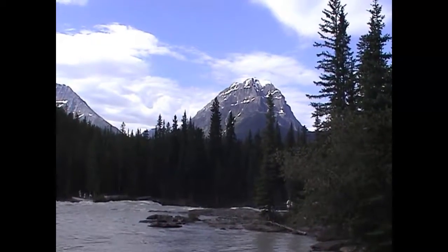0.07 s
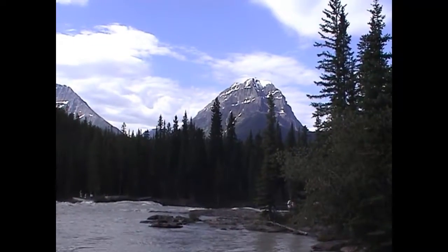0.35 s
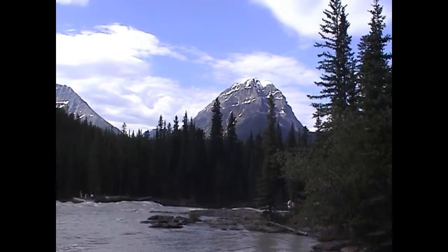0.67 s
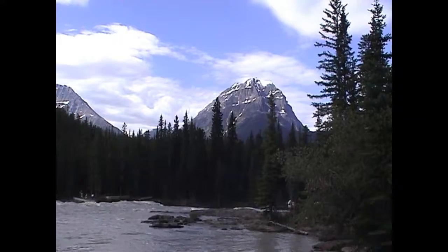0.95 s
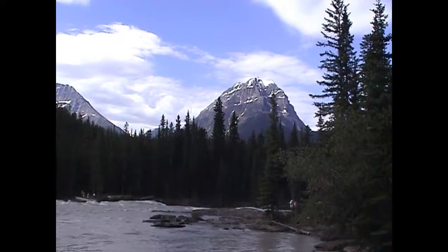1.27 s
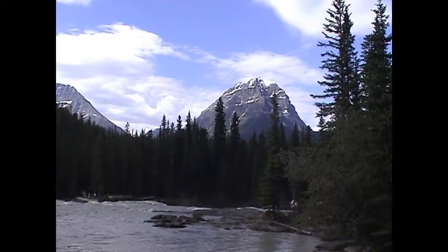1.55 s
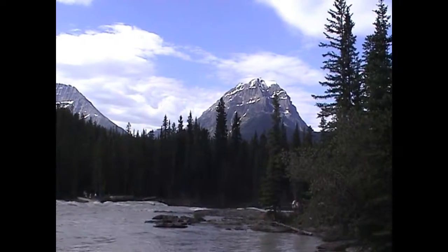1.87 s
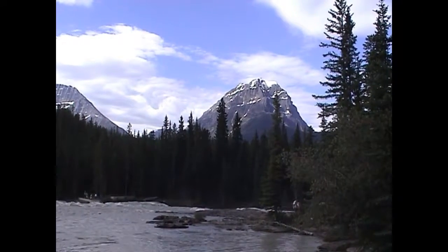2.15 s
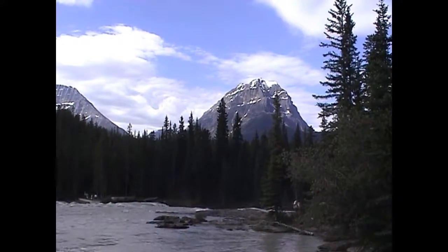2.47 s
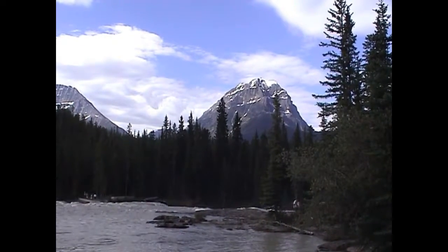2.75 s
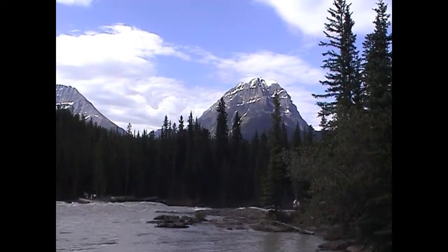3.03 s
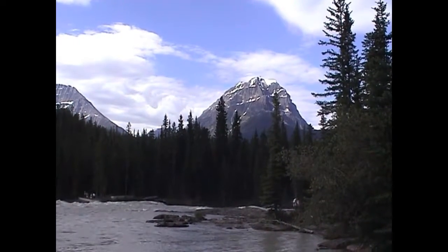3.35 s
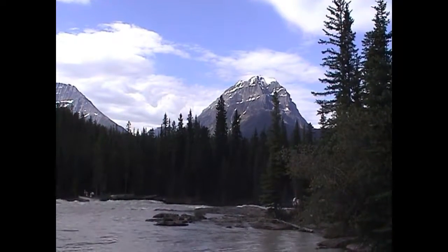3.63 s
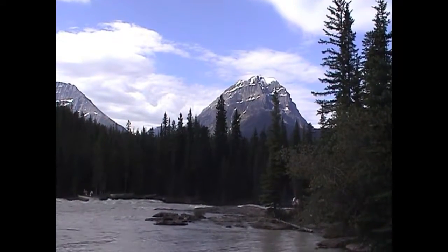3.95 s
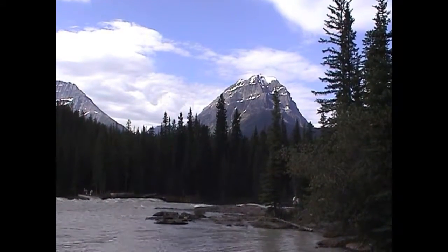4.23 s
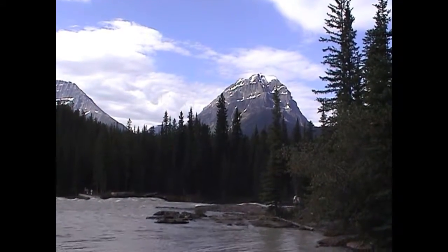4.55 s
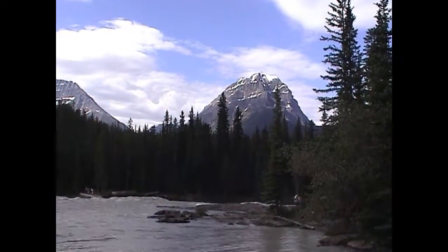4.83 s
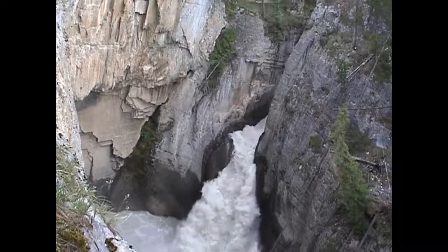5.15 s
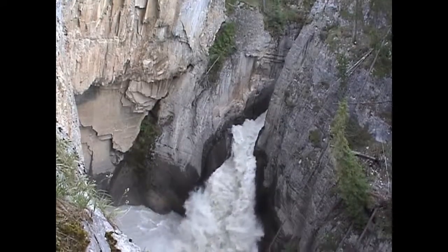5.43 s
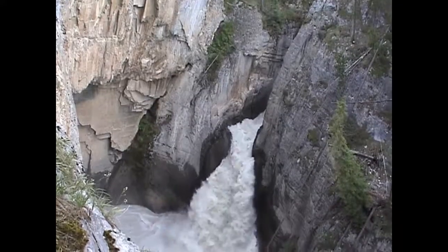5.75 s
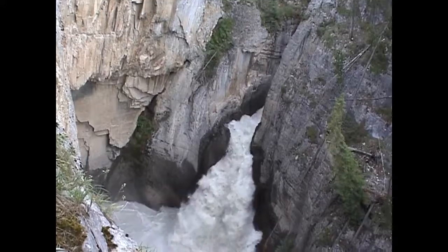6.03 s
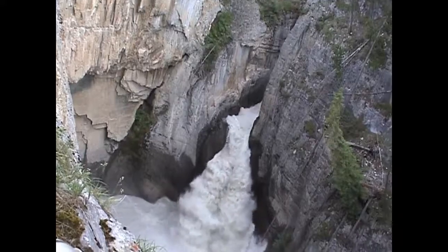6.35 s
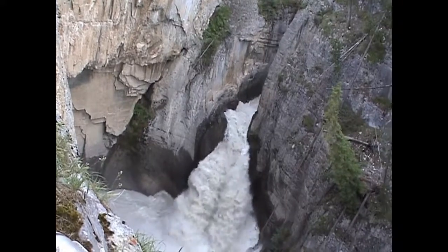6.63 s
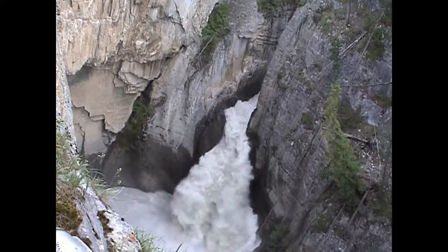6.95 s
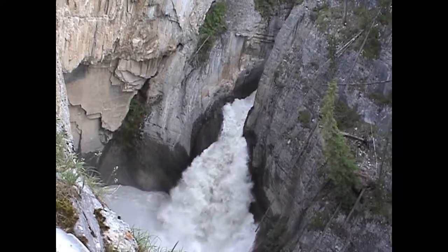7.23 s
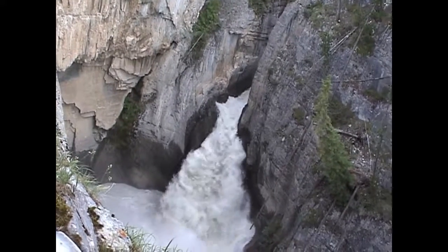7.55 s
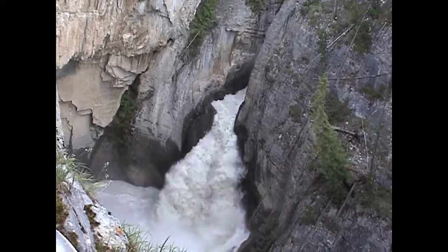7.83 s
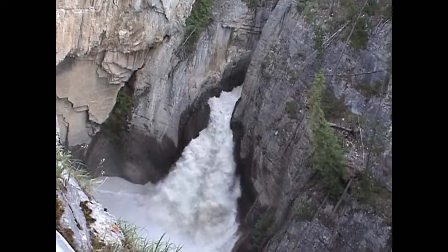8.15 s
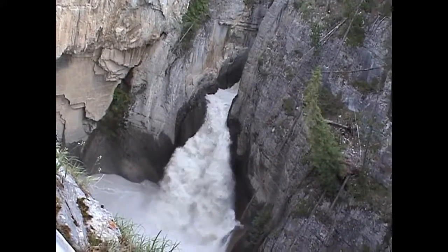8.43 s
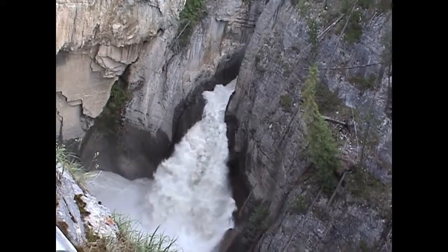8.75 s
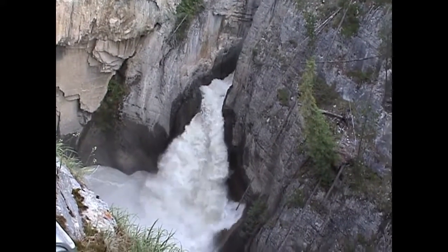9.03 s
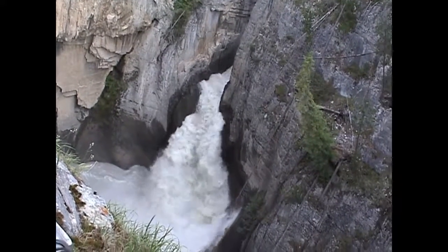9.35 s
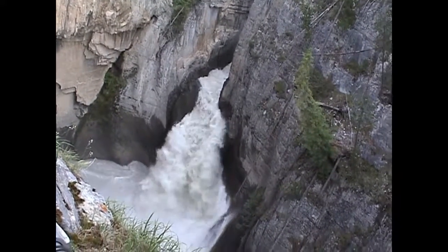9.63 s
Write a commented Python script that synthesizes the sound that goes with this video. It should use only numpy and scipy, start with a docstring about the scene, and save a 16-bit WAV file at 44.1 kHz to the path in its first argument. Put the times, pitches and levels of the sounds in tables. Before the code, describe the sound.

Distant rapids with a soft wash of foam give way suddenly to the loud, hissing rush of a big waterfall.

```python
"""A mountain river, from an open bank and then, after an abrupt cut, in a rock gorge; in stereo.
From the bank, air pockets rumble in far rapids under a soft wash of foam, with one small tick nearby.
In the gorge a big fall drives air into its plunge pool, which booms between the walls,
while the shattering jet hisses in uneven surges and drops spatter on rock."""
import sys
import numpy as np
from scipy import signal
from scipy.fft import rfft, irfft, next_fast_len
from scipy.io import wavfile

SR = 44100
rng = np.random.default_rng(int(sys.argv[2]) if len(sys.argv) > 2 else 0)


def to_wav(sig):
    """Store sig (one row per channel, or 1-D mono) as 16-bit WAV at the path in sys.argv[1].

    Samples outside -1..1 are clipped; the rate is SR.
    """
    pcm = np.clip(np.atleast_2d(sig), -1, 1) * 32767
    pcm = np.round(pcm).astype(np.int16)
    wavfile.write(sys.argv[1], SR, pcm.T)  # frames by channels


N = 431738

# How alike left and right sound; at the top both sides are the same: (frequency [Hz], likeness [0-1])
BANK_LIKENESS = [(40, 0.79), (200, 0.97), (400, 0.83), (1050, 0.69), (1400, 0.46), (1750, 0.58),
                 (4500, 0.5), (5500, 0.87), (8000, 1)]
GORGE_LIKENESS = [(35, 0.37), (80, 0.83), (330, 0.91), (850, 0.8), (1250, 1), (1500, 1), (2200, 0.97),
                  (2900, 1), (4800, 0.81), (5500, 0.57), (6600, 0.25), (8500, 0.75), (11000, 1)]
# Which side is louder: (frequency [Hz], left over right [dB])
BANK_BALANCE = [(40, -2.0), (160, -5.5), (280, -4.4), (400, -2), (850, -1.7), (1280, 2.5), (1550, 2),
                (1950, 3), (4400, 2), (5500, 0.6), (8000, 0.1)]
GORGE_BALANCE = [(50, -8.5), (270, -8), (780, -3.5), (1050, -0.5), (2200, 1.1), (2900, 0), (3900, 2.1),
                 (5500, -1.5), (6400, 1.5), (7300, 6), (8500, 1.5), (10500, 0)]
# Which side the sound reaches first: (frequency [Hz], left phase lead [rad])
BANK_LEAD = [(80, 0.34), (300, -0.34), (900, -0.82), (1350, -1.6), (1600, -0.46), (3000, -0.064)]
GORGE_LEAD = [(50, 0.03), (450, -0.66), (1100, -0.0072), (2200, -0.32), (4900, 0.048), (6500, -0.88),
              (7500, 0.012)]


def from_db(db):
    """Decibels to gain."""
    return 10 ** (np.asarray(db) / 20)


def rms_one(x):
    """Scale to an rms of one."""
    return x / np.sqrt(np.mean(x ** 2) + 1e-20)


def at_hz(points):
    """A table over log frequency, read at every FFT bin."""
    hz, value = np.transpose(points)
    bins = np.linspace(0, SR / 2, next_fast_len(N, real=True) // 2 + 1)
    return np.interp(np.log(bins + 1e-3), np.log(hz), value)


def to_bins(x):
    """Samples to FFT bins."""
    return rfft(x, next_fast_len(N, real=True))


def to_samples(bins):
    """FFT bins to samples."""
    return irfft(bins, next_fast_len(N, real=True))[..., :N]


def drift(rate_hz):
    """A slow random wander of rms 1: noise through two one-pole low-passes."""
    hop, run_in = 40, 2000
    pole = np.exp(-2 * np.pi * rate_hz * hop / SR)
    noise = rng.standard_normal(N // hop + run_in + 2)
    slow = signal.lfilter([1], [1, -2 * pole, pole * pole], noise)[run_in:]
    return np.interp(np.arange(N) / hop, np.arange(len(slow)), rms_one(slow))


def swells(rows):
    """Smooth lulls and swells, each a raised cosine, summed in dB."""
    t = np.arange(N) / SR
    return sum(change_db * np.cos(np.pi * np.clip((t - middle) / length, -.5, .5)) ** 2
               for middle, length, change_db in rows)


def churn(low_hz, high_hz, patchy_db, rate_hz, edges):
    """Two unrelated noises whose bands swell on their own, as clouds of bubbles form and break."""
    rest, out = rng.standard_normal((2, N)), 0
    for edge in np.geomspace(low_hz, high_hz, edges):
        band = to_samples(to_bins(rest) * at_hz([(edge / np.sqrt(2), 1), (edge, 0)]))
        out = out + band * from_db(patchy_db * drift(rate_hz))
        rest = rest - band
    return rms_one(out + rest * from_db(patchy_db * drift(rate_hz)))


def droplets(per_s, spread_db, clump_db, cycles, pitches=20):
    """Drops and bursting bubbles come in clumps; each rings a few cycles at one of many pitches."""
    sizes = from_db(spread_db * np.minimum(rng.exponential(1, N), 4)) * rng.choice([-1, 1], N)
    born = rng.random(N) < per_s * from_db(clump_db * drift(14)) / SR
    pitch_index, out = rng.integers(0, pitches, N), 0
    for k, hz in enumerate(np.geomspace(1600, 14000, pitches)):
        pole = from_db(-60 * hz / (cycles * SR))
        resonance = [1, -2 * pole * np.cos(2 * np.pi * hz / SR), pole * pole]
        hits = sizes * born * (pitch_index == k) + 1e-18
        out = out + signal.lfilter(np.array([1, 0, -1]) * (1 - pole * pole), resonance, hits)
    return rms_one(out)


def in_stereo(sounds, colour, likeness, balance, lead):
    """Colour a common and an opposed sound and mix them to left and right; the middle has rms 1."""
    common, apart = to_bins(sounds)
    alike = np.clip(at_hz(likeness), 0, 1)
    sides = np.array([[1], [-1]])
    channels = from_db(sides * at_hz(balance) / 2) * np.exp(1j * sides * at_hz(lead) / 2)
    shared = channels * np.sqrt(1 + alike)
    opposed = channels * sides * np.sqrt(1 - alike)
    middle = np.hypot(abs(shared.mean(0)), abs(opposed.mean(0)))
    out = to_samples((shared * common + opposed * apart) / middle * from_db(at_hz(colour)))
    return out / np.std(out.mean(0))


def foam(level_db=-34.5):
    """Distance blurs the foam into a steady wash with only a little fizz left in it."""
    # Foam heard from the bank: (frequency [Hz], relative level [dB])
    foam_colour = [(820, -39), (1400, -8), (1720, -3), (2000, -4.5), (2190, -9), (2460, -5.5), (2800, -9),
                   (4050, -15), (4610, -19.5), (6020, -18), (6710, -25.5), (8870, -30.5), (9690, -37),
                   (15000, -47)]
    wash = churn(2200, 6200, patchy_db=0.46, rate_hz=8, edges=3)
    wash[0] += from_db(-9.5) * droplets(per_s=5000, spread_db=4, clump_db=0.5, cycles=5.3)
    return from_db(level_db) * in_stereo(wash, foam_colour, BANK_LIKENESS, BANK_BALANCE, BANK_LEAD)


def rapids(level_db=-26):
    """Large air pockets pound in the white water, far off across the open river."""
    # The distant rumble: (frequency [Hz], relative level [dB])
    rumble = [(15, -60), (25, -33), (70, -10.5), (130, -3.5), (195, 0), (265, -1.5), (375, -8), (520, -5),
              (660, -10), (880, -7.5), (1130, -11), (1380, -20), (1900, -52), (3000, -120)]
    pounding = churn(73, 580, patchy_db=0.53, rate_hz=7, edges=4)
    return from_db(level_db) * in_stereo(pounding, rumble, BANK_LIKENESS, BANK_BALANCE, BANK_LEAD)


def tick(rise_s=.0015, t60_s=0.029):
    """A short, dry tick close to the microphone, dead centre."""
    # Onset and strength: (time [s], level [dB])
    onsets = [(1.861, -19.5)]
    # The tick's tone: (frequency [Hz], relative level [dB])
    tick_colour = [(200, 0), (1200, 6), (3000, -5), (8000, -12), (12000, -30), (15000, -42)]
    envelope = 0
    for onset_s, level_db in onsets:
        age = np.maximum(np.arange(N) / SR - onset_s, 0)
        attack = np.minimum(age / rise_s, 1)
        envelope = envelope + attack * from_db(level_db - 60 * np.minimum(age / t60_s, 2))
    crack = to_samples(to_bins(rng.standard_normal(N)) * from_db(at_hz(tick_colour)))
    return envelope * rms_one(crack)


def plunge_pool(level_db=-25):
    """The jet drives air deep into the pool, which booms between the rock walls."""
    # The boom in the gorge: (frequency [Hz], relative level [dB])
    boom = [(15, -50), (25, -26), (64, -12.5), (123, -8.5), (154, -5.5), (227, -4.5), (300, -2.5),
            (484, -5.5), (757, -12.5), (1000, -13.5), (1300, -19), (2200, -120)]
    bubbles = churn(95, 640, patchy_db=0.5, rate_hz=4.4, edges=4)
    return from_db(level_db) * in_stereo(bubbles, boom, GORGE_LIKENESS, GORGE_BALANCE, GORGE_LEAD)


def jet_surge_db(slug_db=.35, slugs_per_s=2.18, crest_s=4.4, flutter_db=0.46):
    """The jet falls in slugs at a gentle beat, with chance flutter and a few larger surges."""
    # The jet's lulls and swells: (middle time [s], length [s], level change [dB])
    surges = [(6.52, 0.32, -0.8), (7.49, .16, -1.3), (7.65, .1, 1.5), (9.613, .1, 1.3)]
    beat = slug_db * np.cos(2 * np.pi * slugs_per_s * (np.arange(N) / SR - crest_s))
    return beat + swells(surges) + flutter_db * drift(4.7)


def spray(level_db=-15.5, mist_wander_db=0.1):
    """Slugs of water shatter into hiss; drops spatter on rock and the finest mist comes and goes."""
    # Spray heard in the gorge: (frequency [Hz], relative level [dB])
    spray_colour = [(500, -90), (1000, -14), (1550, -7), (2270, 1.2), (2850, -7.5), (3350, -7),
                    (4800, -12.5), (5300, -18.5), (6400, -27.5), (7800, -26), (10700, -33.5),
                    (13800, -42.8), (15000, -54)]
    # The mist briefly thins or thickens: (middle time [s], length [s], level change [dB])
    mist_surges = [(6.0, .5, -2.5), (7.94, 0.2, -2.2), (8.18, .12, 2)]
    hiss = churn(1600, 7200, patchy_db=0.13, rate_hz=7.8, edges=5)
    hiss[0] += from_db(-6.5) * droplets(per_s=8000, spread_db=2, clump_db=2, cycles=5.8)
    jet = in_stereo(hiss, spray_colour, GORGE_LIKENESS, GORGE_BALANCE, GORGE_LEAD)
    mist = to_samples(to_bins(jet) * at_hz([(4500, 0), (6000, 0.82)]))   # most of the top end
    jet_gain = from_db(level_db + jet_surge_db())
    mist_gain = from_db(swells(mist_surges) + mist_wander_db * drift(5))
    return jet_gain * (jet - mist + mist_gain * mist)


def scene(cut_s=5.019):
    """The river bank gives way to the gorge within a millisecond."""
    bank = rapids() + foam() + tick()
    gorge = plunge_pool() + spray()
    in_gorge = np.interp(np.arange(N) / SR, [cut_s, cut_s + 1e-3], [0, 1])
    return (1 - in_gorge) * bank + in_gorge * gorge


def record(dry):
    """The top is cut steeply above 15 kHz."""
    return signal.sosfilt(signal.ellip(12, .1, 80, 15000, fs=SR, output="sos"), dry)


dry = scene()
out = record(dry)
to_wav(out)
```